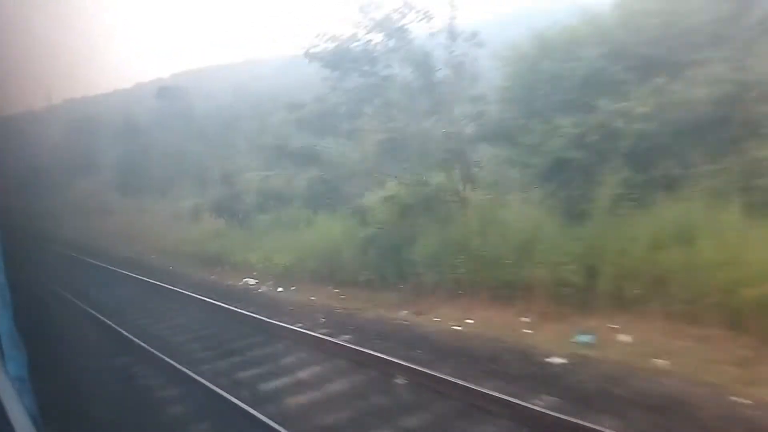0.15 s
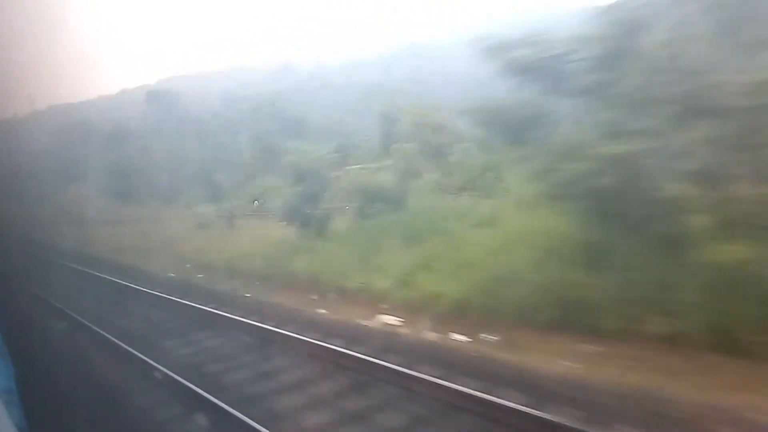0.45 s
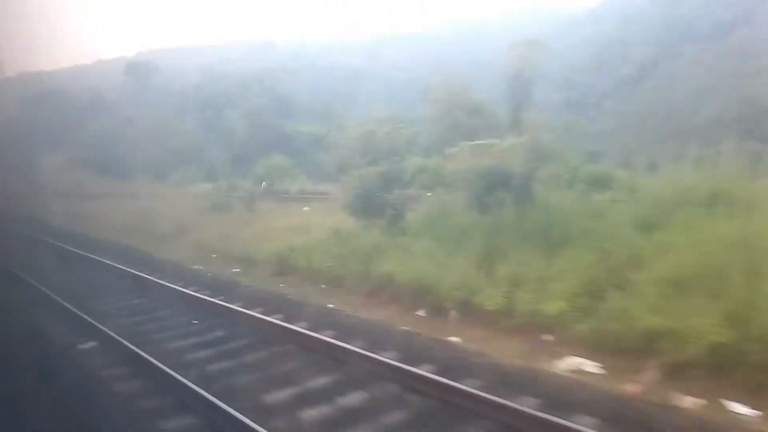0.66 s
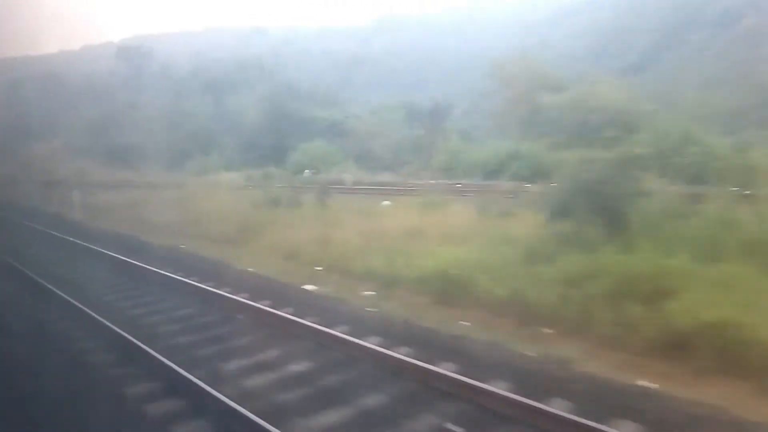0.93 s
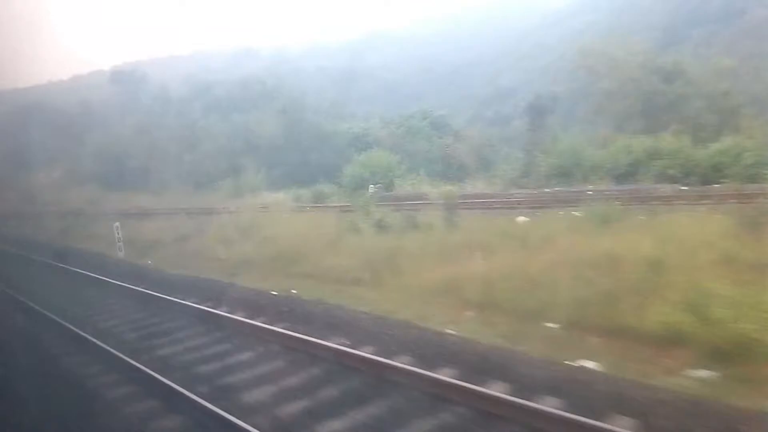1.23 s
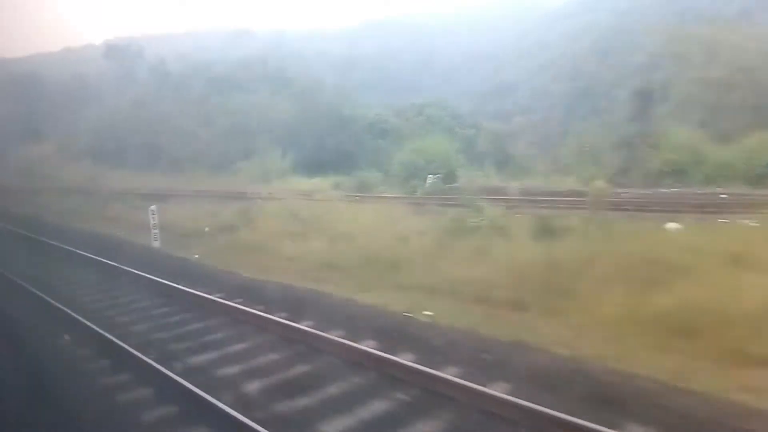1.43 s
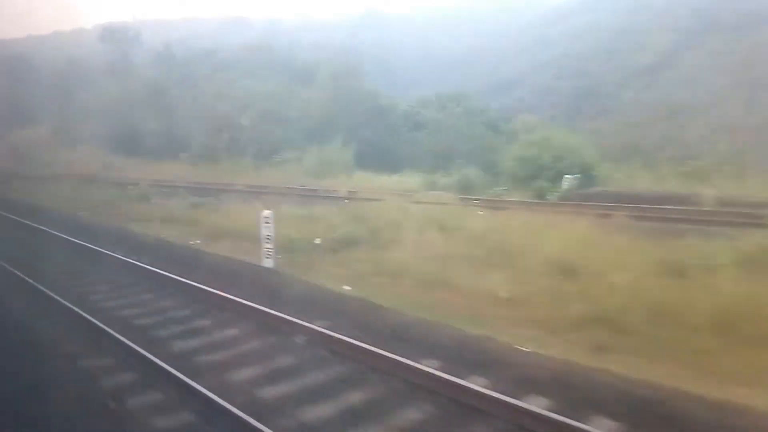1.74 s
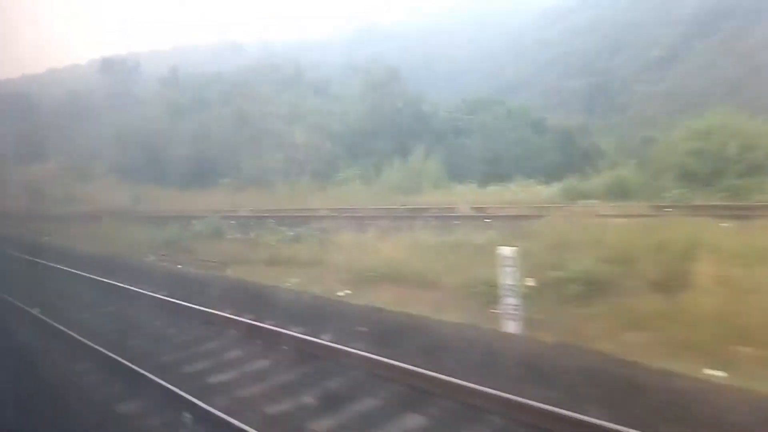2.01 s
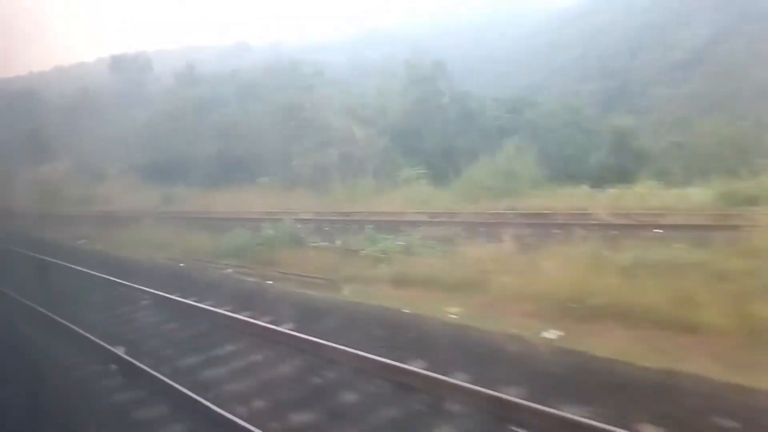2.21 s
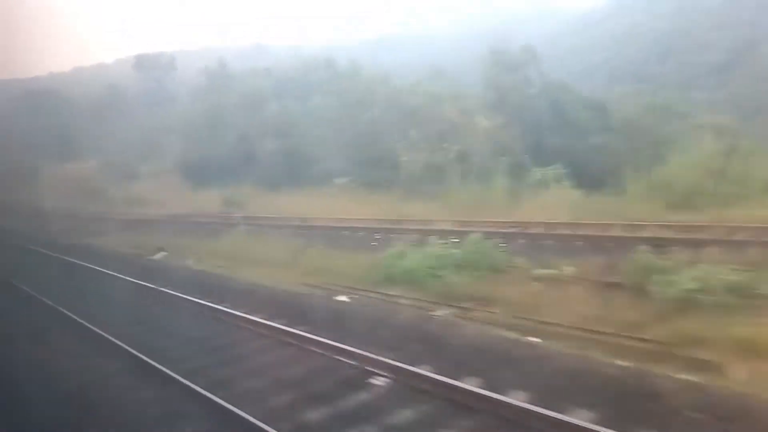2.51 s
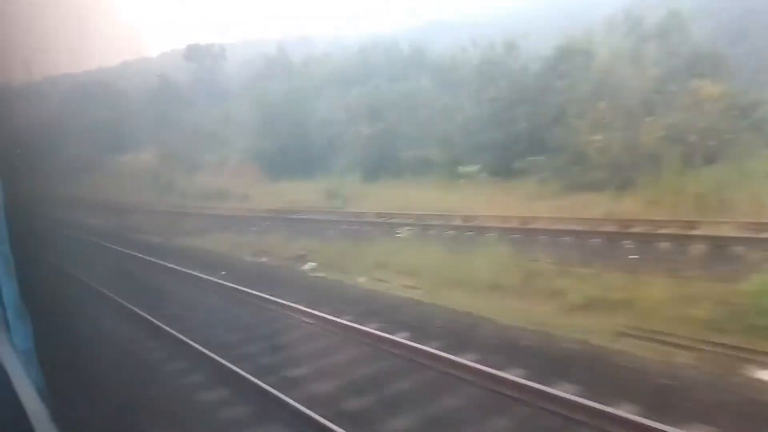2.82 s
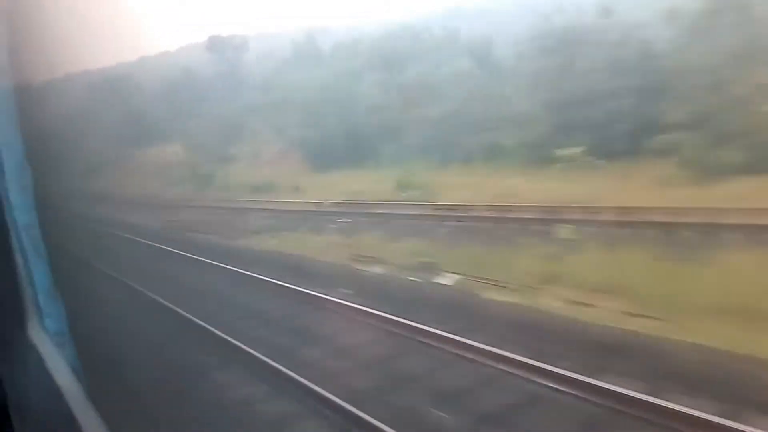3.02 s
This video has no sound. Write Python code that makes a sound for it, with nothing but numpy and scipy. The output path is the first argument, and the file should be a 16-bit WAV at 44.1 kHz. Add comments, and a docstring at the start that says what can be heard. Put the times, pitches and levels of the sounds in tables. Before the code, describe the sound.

Deep, dull rumble of a passenger train at speed, heard inside a closed coach with light rattles

```python
"""Inside a closed passenger coach at speed: random shaking from the running gear booms in low resonances.
Filtered noise makes a dull roar of wheels on rail, trembling with the boom, and a faintly ringing hiss.
Bursts of random contacts chatter in the loose window fittings, and short noise taps make them tick.
Soft wheel clunks shake the wall panel; near the start sharp contacts and a scrape knock close by."""
import sys
import numpy as np
from scipy import signal
from scipy.fft import rfft, irfft
from scipy.io import wavfile
from scipy.ndimage import uniform_filter1d

SR = 44100
rng = np.random.default_rng(int(sys.argv[2]) if len(sys.argv) > 2 else 0)


def master_out(mix):
    """Clip the mix to full scale and print it as 16-bit PCM to the path in sys.argv[1]."""
    frames = np.transpose(np.atleast_2d(mix))
    ceiling = np.clip(frames, -1, 1)
    pcm = np.round(ceiling * 32767).astype(np.int16)
    wavfile.write(sys.argv[1], SR, pcm)


N = 138915
T = np.arange(N) / SR  # time [s]

# In every table of modes, "width" is that of one of two equal passes and "share" is relative energy.
# deep cabin resonances: (frequency [Hz], width [Hz], share [dB])
BOOM_MODES = [(51.37, 5, -2), (58.16, 13.6, -1)]
# cabin resonances above the boom: (frequency [Hz], width [Hz], share [dB])
DRONE_MODES = [(106.79, 7.97, 1.5), (96.1, 14, -3.5), (129.6, 26.5, -6.5), (154.5, 29, -22),
               (202.2, 8.7, -21), (285.3, 8.8, -28)]
# swells of the boom ahead of its band filter: (time [s], level [dB])
BOOM_LEVEL = [(0, -25), (.23, -15), (.33, -24), (.53, -13), (.6, -23), (.8, -15.5), (.93, -22.5),
              (.99, -35), (1.06, -11.5), (1.13, -34), (1.27, -25.5), (1.38, -20), (1.53, -22),
              (1.62, -17.5), (1.71, -16), (2.0, -17.5), (2.07, -40.5), (2.15, -15), (2.38, -19.5),
              (2.58, -20), (2.68, -16.5), (2.98, -17.5), (3.15, -24)]
# swells of the drone: (time [s], level [dB])
DRONE_LEVEL = [(0.0, -34), (0.18, -22.5), (0.2, -35), (0.28, -25.5), (0.35, -29), (0.46, -26), (0.61, -32),
               (0.67, -26.5), (0.91, -24.5), (0.96, -23.5), (0.98, -33), (1.1, -21.5), (1.17, -25),
               (1.4, -27), (1.43, -14.5), (1.46, -21.5), (1.5, -32.5), (1.57, -23), (1.62, -32),
               (1.65, -25.5), (2.06, -24), (2.1, -32), (2.17, -24.5), (2.27, -34.5), (2.39, -19),
               (2.43, -30.5), (2.74, -23.5), (2.8, -30), (2.89, -23), (3.15, -25.5)]
BOOM_EDGES_HZ, BOOM_TRIM_DB = (44, 72), 0.18
BOOM_EVEN, DRONE_EVEN = .97, .75  # share of the random swells evened out

# colour of wheels on rail: (frequency [Hz], relative density [dB per Hz])
ROAR_COLOUR = [(12, 8), (30, 8), (70, 15.5), (120, 11), (170, 3), (245, -4.5), (400, -5), (520, -7),
               (620, -14), (900, -15.5), (1080, -26), (1250, -33.5), (1800, -34), (2700, -50.5),
               (6000, -63)]
# swells of the roar, of which only the motion about their mean counts: (time [s], level [dB])
ROAR_SWELL = [(0, -36.5), (.1, -40.5), (.22, -37.5), (.33, -48), (.53, -38), (.72, -49.5), (.8, -36),
              (.86, -53), (.95, -38), (1.2, -48.5), (1.6, -42.5), (1.95, -47), (2.24, -38.5), (2.44, -49),
              (2.53, -37.5), (2.57, -48), (2.68, -36), (2.78, -43), (2.88, -43.5), (3.15, -39)]
ROAR_DB, SWELL_SHARE, ROAR_WAVER_DB = -32.5, .7, 1.3
TREMBLE_DEPTH = .13  # roar gain per unit rms of the evened rumble

# chatter bursts:
# (time [s], length [s], ringing note [Hz], panel [dB], pane [dB], frame [dB], note [dB])
RATTLES = [(0.151, 0.0085, 1480, -41, -73.5, -70, -56.5), (0.455, 0.053, 1840, -44, -62, -69, -63),
           (0.592, 0.035, 1503, -47, -65, -71.5, -67.5), (0.627, 0.047, 2300, -47, -69, -78, -65),
           (1.037, 0.042, 1850, -43.5, -57.5, -62, -59.5), (1.095, 0.036, 1760, -53.5, -82, -68, -65.5),
           (1.286, 0.0062, 2270, -43, -50, -68, -56.5), (1.305, 0.0087, 1320, -45, -56.5, -72, -52),
           (1.515, 0.032, 3870, -48.5, -56, -64.5, -60), (1.625, 0.026, 629, -42, -53, -60, -45),
           (1.664, 0.019, 1780, -45.5, -57.5, -57, -62), (2.21, 0.046, 2390, -42, -63, -66.5, -65),
           (2.479, 0.016, 1760, -43, -61, -67, -54.5), (2.596, 0.059, 886, -50.5, -58, -64, -55),
           (2.821, 0.012, 2000, -41.5, -57, -64.5, -56.5), (2.841, 0.042, 3180, -42, -67.5, -61, -64),
           (2.939, 0.026, 1350, -51, -58, -66, -52.5), (3.109, 0.03, 1890, -40, -72, -82, -65.5)]
# wall panel resonances: (frequency [Hz], width [Hz], share [dB])
PANEL_MODES = [(291, 39, 2), (414, 230, 2), (583, 160, -6), (796, 130, -3.5), (994, 110, -8)]
# window pane resonances: (frequency [Hz], width [Hz], share [dB])
PANE_MODES = [(1530, 330, 9.5), (1790, 190, 9), (2305, 140, 1), (2020, 580, 4.5)]
# window frame resonances: (frequency [Hz], width [Hz], share [dB])
FRAME_MODES = [(3160, 640, -1.5), (3600, 1400, 3.5), (3660, 830, 1.5), (4270, 260, -6.5),
               (6300, 400, -11.5)]
CHATTER_PER_S, CHATTER_SPREAD_DB = 600, 3.8  # contact rate and random spread of their size
CHATTER_ATTACK_S, CHATTER_RELEASE_S = .004, .012
NOTE_WIDTH_HZ, PANEL_TOP_HZ = 160, 1230

# contacts of the knock: (time [s], body [dB], click [dB])
KNOCKS = [(0.0701, -31, -46.5), (0.0716, -24, -72), (0.075, -39, -70), (0.0821, -39.5, -62)]
# hollow body of the knock: (frequency [Hz], width [Hz], share [dB])
KNOCK_MODES = [(288, 42, 12.5), (439, 394, 19.5), (760, 460, 11.5), (1083, 310, 10), (1624, 270, 2)]
# bright click of the knock: (frequency [Hz], width [Hz], share [dB])
CLICK_MODES = [(3780, 1200, 12.5), (4490, 390, 8), (5800, 980, 13.5), (7300, 410, 4), (10400, 1000, -0.5)]
CONTACT_DB = 24  # added to every contact of the knock
KNOCK_SCRAPE_DB, CLICK_SCRAPE_DB = -38, -51
SCRAPE_ATTACK_S, SCRAPE_HOLD_S, SCRAPE_RELEASE_S = .002, .017, .006
BODY_TOP_HZ, CLICK_EDGES_HZ = 2170, (3000, 10800)

# single ticks of the fittings: (time [s], ringing note [Hz], frame [dB], note [dB])
TICKS = [(1.295, 1410, -74, -45.5), (1.67, 5780, -54.5, -50.5), (2.008, 1560, -67.5, -59.5),
         (2.064, 4530, -54.5, -64), (2.611, 1920, -60, -51), (2.732, 1710, -60, -56.5),
         (2.791, 2380, -57.5, -56.5), (2.871, 1160, -63, -46), (2.987, 3920, -68, -63),
         (3.011, 6140, -86, -61.5)]
TICK_DECAY_S, TICK_WIDTH_HZ, TICK_TOP_HZ = 0.0081, 910, 7260

# soft clunks of the wheels through the floor: (time [s], level [dB])
CLUNKS = [(0.159, -40), (.26, -41), (.456, -44), (0.972, -43.5), (1.627, -37), (1.767, -48.5), (1.815, -38),
          (2.139, -38.5), (2.337, -44), (2.397, -52), (2.595, -31.5), (2.612, -30), (2.825, -34.5)]
CLUNK_DECAY_S = 0.006

# colour of the hiss: (frequency [Hz], relative density [dB per Hz])
HISS_COLOUR = [(1500, 3), (2700, -3.5), (3300, 1.5), (3900, 3), (4900, -5), (6000, -4.5), (7200, -11.5),
               (8500, -29), (15000, -30)]
# swells of the hiss: (time [s], level [dB])
HISS_LEVEL = [(0, -70.5), (.2, -66), (.4, -67), (.7, -69), (.87, -72), (.98, -68), (1.2, -70), (1.45, -74),
              (1.6, -65.5), (1.97, -74), (2.25, -65), (2.55, -69), (2.75, -67), (3, -64.5), (3.15, -68)]
# faint metallic ringing of wheels and rail: (frequency [Hz], width [Hz], share [dB])
WHEEL_MODES = [(1850, 70, -7), (2310, 61, -1.5), (3430, 260, -1.5), (4020, 43, 1.5), (4520, 120, -6.5),
               (5750, 210, -5), (6340, 160, -12.5)]
WHEEL_DB, HISS_WAVER_DB = -10, 1.2  # ringing relative to the hiss noise; spread of the waver

TOP_HZ = 15600


def cabin():
    """Random shaking from the running gear rings the low resonances of the coach."""
    boom = steady(ring(rng.standard_normal(N), BOOM_MODES), BOOM_EVEN) * undb(curve(BOOM_LEVEL))
    drone = steady(ring(rng.standard_normal(N), DRONE_MODES), DRONE_EVEN) * undb(curve(DRONE_LEVEL))
    band = signal.butter(2, BOOM_EDGES_HZ, "band", fs=SR, output="sos")
    return signal.sosfiltfilt(band, boom, padtype=None) * undb(BOOM_TRIM_DB) + drone


def roar(rumble):
    """Wheels on rail make a dull broadband roar whose strength follows the rumble's waveform."""
    swell = curve(ROAR_SWELL)
    level_db = ROAR_DB + SWELL_SHARE * (swell - swell.mean()) + ROAR_WAVER_DB * walk(30)
    tremble = 1 + TREMBLE_DEPTH * steady(rumble, 1.0)
    return noise(ROAR_COLOUR) * undb(level_db) * tremble


def rattles():
    """Bursts of dense contacts ring the wall panel, pane, frame and the loose fitting's own note."""
    chatter = contacts(CHATTER_PER_S)  # shared by the notes and the pane
    notes, forces = 0, np.zeros((3, N))
    for start, length, note_hz, *part_dbs, note_db in RATTLES:
        shake = burst(start, length, CHATTER_ATTACK_S, CHATTER_RELEASE_S)
        forces = forces + undb(part_dbs)[:, None] * shake
        notes = notes + undb(note_db) * ring(shake * chatter, [(note_hz, NOTE_WIDTH_HZ, 0)])
    on_panel, on_pane, on_frame = forces
    pane = ring(on_pane * chatter, PANE_MODES)
    frame = ring(on_frame * contacts(CHATTER_PER_S), FRAME_MODES)
    return notes + pane + frame + panel(on_panel * contacts(CHATTER_PER_S))


def knock():
    """A latch-like clack: quick contacts and a short scrape excite a hollow body and a bright click."""
    body = strike([(s, db) for s, db, _ in KNOCKS], KNOCK_MODES, KNOCK_SCRAPE_DB)
    click = strike([(s, db) for s, _, db in KNOCKS], CLICK_MODES, CLICK_SCRAPE_DB)
    band = signal.butter(6, CLICK_EDGES_HZ, "band", fs=SR, output="sos")
    return lowpass(body, BODY_TOP_HZ) + signal.sosfilt(band, click)


def ticks():
    """Lone light taps, each a dying puff of noise, ring the frame and the fitting that makes them."""
    out = 0
    for start, note_hz, frame_db, note_db in TICKS:
        tap = fade(start, TICK_DECAY_S) * rng.standard_normal(N)
        frame = undb(frame_db) * ring(tap, FRAME_MODES)
        note = undb(note_db) * ring(tap, [(note_hz, TICK_WIDTH_HZ, 0)])
        out = out + frame + note
    return lowpass(out, TICK_TOP_HZ)


def clunks():
    """Muffled wheel impacts, as dying puffs of noise, shake the wall panel."""
    force = sum(undb(db) * fade(start, CLUNK_DECAY_S) for start, db in CLUNKS)
    return panel(force * rng.standard_normal(N))


def hiss():
    """Thin noise with the faint metallic resonances of wheels and rail ringing inside it."""
    ringing = undb(WHEEL_DB) * ring(rng.standard_normal(N), WHEEL_MODES)
    level_db = curve(HISS_LEVEL) + HISS_WAVER_DB * walk(27)
    return (noise(HISS_COLOUR) + ringing) * undb(level_db)


def panel(force):
    """The heavy wall panel answers a force dully, with no treble."""
    return lowpass(ring(force, PANEL_MODES), PANEL_TOP_HZ)


def strike(hits, modes, scrape_db):
    """Sharp (time [s], level [dB]) contacts and a noisy scrape from the first one ring a set of modes."""
    push = np.zeros(N)
    for start, db in hits:
        push[int(start * SR)] += undb(db + CONTACT_DB)
    scrape = undb(scrape_db) * burst(hits[0][0], SCRAPE_HOLD_S, SCRAPE_ATTACK_S, SCRAPE_RELEASE_S)
    return ring(push + scrape * rng.standard_normal(N), modes)


def contacts(per_s):
    """Little impacts at random times, of random sign and size, with rms 1."""
    hit = rng.random(N) < per_s / SR
    sign = rng.choice([-1, 1], N)
    size = undb(CHATTER_SPREAD_DB * rng.standard_normal(N))
    return unit(hit * sign * size)


def ring(x, modes):
    """Pass x through doubled band resonances, with an rms gain of 1 across the spectrum."""
    s = 2j * np.pi * np.arange(N + 1) / 2 / N * SR
    body = 0
    for hz, width_hz, db in modes:
        w, b = 2 * np.pi * hz, 2 * np.pi * width_hz
        one_pass = b * s / (s * s + b * s + w * w)
        body = body + undb(db) / np.sqrt(width_hz) * one_pass ** 2
    gain = body / np.sqrt(np.mean(abs(body) ** 2))
    return irfft(rfft(x, 2 * N) * gain)[:N]  # padded so that no tail wraps round


def noise(points):
    """Noise of rms 1, coloured by (frequency [Hz], density [dB]) points joined on a log frequency axis."""
    hz, db = np.array(points).T
    f = np.maximum(np.arange(N // 2 + 1) * SR / N, 1)
    colour = undb(np.interp(np.log(f), np.log(hz), db))
    return unit(irfft(rfft(rng.standard_normal(N)) * colour, N))


def walk(rate):
    """Slow random waver with rms 1; a higher rate [per s] moves faster."""
    k = int(SR / rate)
    once = uniform_filter1d(rng.standard_normal(N), k, mode="wrap")
    return unit(uniform_filter1d(once, k, mode="wrap"))


def steady(x, share):
    """Even out a share of the slow swells of a rumble, then set rms 1."""
    power = uniform_filter1d(abs(signal.hilbert(x)) ** 2, size=3500)  # smoothed over about 80 ms
    return unit(x / power ** (np.clip(share, 0, 1) / 2))


def burst(start, length, attack_s, release_s):
    """Straight attack, then a hold and an exponential release; length counts from the start."""
    attack = np.clip((T - start) / attack_s, 0, 1)
    return attack * np.exp(-np.maximum(T - start - length, 0) / release_s)


def fade(start, decay_s):
    """A sudden start that dies away exponentially."""
    return (T >= start) * np.exp(-abs(T - start) / decay_s)


def lowpass(x, hz):
    """Steep low-pass."""
    return signal.sosfilt(signal.butter(6, hz, fs=SR, output="sos"), x)


def curve(rows):
    """Join (time [s], value) rows by straight lines."""
    return np.interp(T, *np.array(rows).T)


def unit(x):
    """Scale to rms 1."""
    return x / np.sqrt(np.mean(x ** 2))


def undb(db):
    """Decibels to gain."""
    return 10 ** (np.asarray(db) / 20)


def scene():
    """Everything heard at the window seat, in one channel."""
    rumble = cabin()
    mix = rumble + roar(rumble) + rattles() + knock() + ticks() + clunks() + hiss()
    return mix[None]


def record(dry):
    """Cut the extreme treble with a steep elliptic low-pass."""
    top_cut = signal.ellip(8, .2, 70, TOP_HZ, fs=SR, output="sos")  # ripple and rejection in dB
    return signal.sosfilt(top_cut, dry)


dry = scene()
out = record(dry)
master_out(out)
```